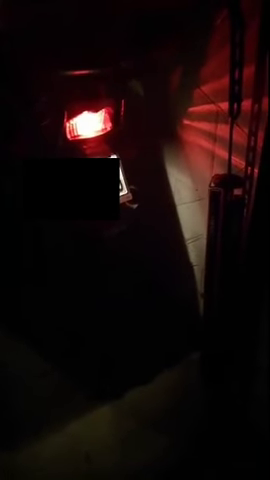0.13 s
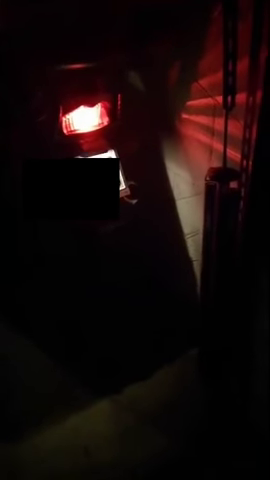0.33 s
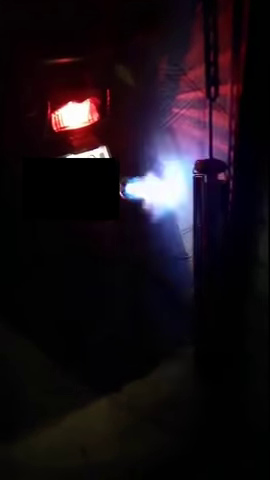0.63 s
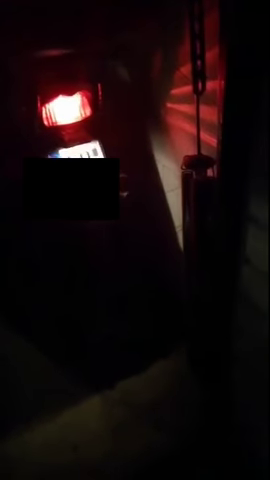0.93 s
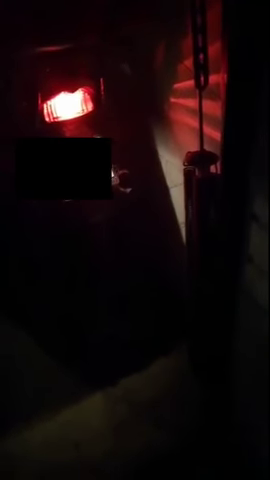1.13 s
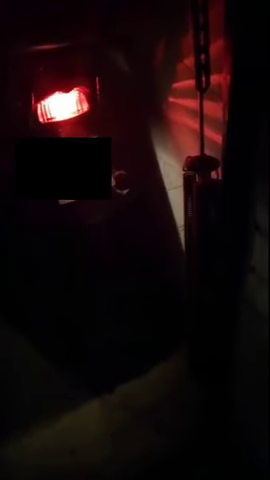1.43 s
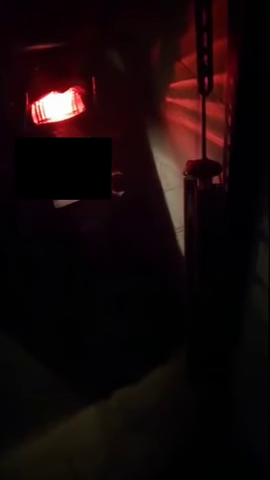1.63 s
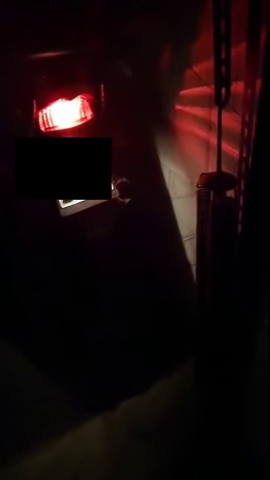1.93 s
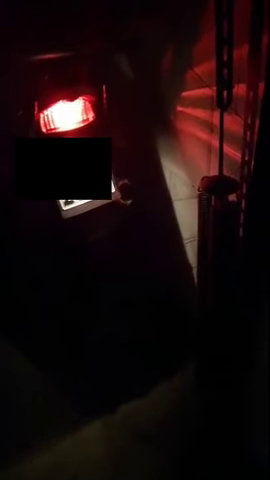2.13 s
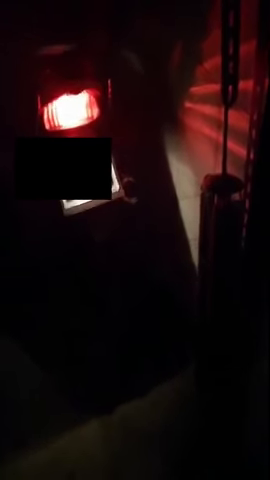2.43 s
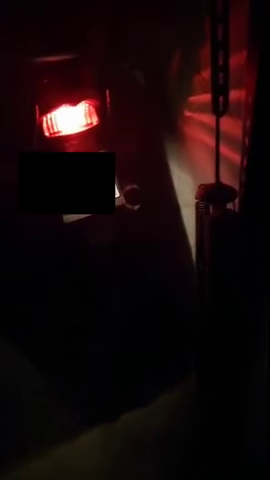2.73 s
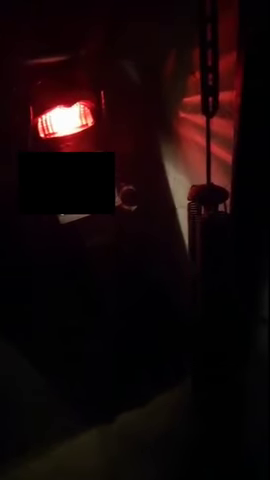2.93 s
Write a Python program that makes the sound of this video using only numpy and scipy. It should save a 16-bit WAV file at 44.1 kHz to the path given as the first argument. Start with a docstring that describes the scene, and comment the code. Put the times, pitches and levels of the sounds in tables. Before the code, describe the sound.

A four-cylinder motorcycle, heard close behind the exhaust, is blipped four times; each rasping howl leaps up, then winds down with burbles and sharp backfire pops in a small, hard-walled space, muffled on top and slightly overloaded.

```python
"""In a small hard-walled space, a four-cylinder motorcycle is blipped four times, heard from behind the exhaust.
Sines that follow the firing rate make the engine tone, whine and howl, with puffed noise for rasp and hiss.
Each firing under load also rings the tailpipe; unburnt fuel burbles and pops as the engine runs down.
Scattered echoes add the space. A small stereo recorder cuts the treble and clips the loudest peaks."""
import sys
import numpy as np
from scipy import signal
from scipy.fft import rfft, irfft
from scipy.io import wavfile
from scipy.ndimage import uniform_filter1d

SR = 44100
rng = np.random.default_rng(int(sys.argv[2]) if len(sys.argv) > 2 else 0)


def store_pcm(level_fs):
    """Save levels as 16-bit WAV."""
    pcm = np.round(np.clip(level_fs, -1, 1) * 32767).astype(np.int16)
    wavfile.write(sys.argv[1], SR, np.atleast_2d(pcm).T)


def amplitude_ratio(level_db):
    """Convert a level in decibels to the matching linear amplitude (field) ratio."""
    exponent = np.asarray(level_db, float) / 20
    return 10 ** exponent


N = 136710  # length in samples

# Firing rate and the tone at that rate: time_s, firing_hz, level_db
FIRING_CURVE = [(0, 198.4, -31.5), (.08, 189.3, -35), (.14, 223.3, -10.5), (.2, 273.5, -9.5),
                (.3, 359.6, -21.5), (.48, 321.4, -30), (.6, 269.3, -29.5), (.73, 246.7, -18),
                (.89, 217, -17.5), (.94, 213.7, -28), (1.01, 243.4, -11), (1.06, 280.5, -13),
                (1.12, 341.3, -13.5), (1.17, 353.4, -24.5), (1.26, 328.5, -29.5), (1.37, 295.6, -29.5),
                (1.42, 280, -20), (1.53, 256, -21), (1.57, 244.8, -15.5), (1.67, 225.5, -15.5),
                (1.7, 217.2, -25), (1.75, 210.8, -28.5), (1.81, 234, -8), (1.87, 293.3, -13.5),
                (1.92, 337.1, -10), (1.97, 365.5, -15), (2.1, 333.4, -22), (2.17, 308, -32),
                (2.3, 271, -24), (2.49, 228.2, -15.5), (2.545, 222.7, -24.5), (2.59, 235.1, -11.5),
                (2.64, 284.5, -15.5), (2.71, 356.3, -8.5), (2.78, 379.3, -15), (2.86, 355.8, -17.5),
                (2.93, 329.9, -22), (3.1, 272.7, -36)]
# Throttle blips: opens_s, shuts_s, howl_db
THROTTLE_BLIPS = [(0.088, 0.24, -22), (0.953, 1.106, -23), (1.756, 1.911, -22.5), (2.542, 2.695, -23.5)]
# Multiples of the firing rate in the howl and whine: multiple, level_db (before the pipe shapes it)
FIRING_ORDERS = [(.5, -7), (1.5, -10.5), (2, 5.5), (2.5, -10), (3, 4), (3.5, -9.5), (4, 1), (5, 1.5),
                 (6, -3), (7, -3.5)]
# How the pipe passes the howl: pitch_hz, gain_db
PIPE_RESPONSE = [(100, -6.5), (330, 7), (400, 8.5), (470, 8), (560, -4.5), (680, 0.5), (780, 0.5),
                 (920, -4), (1100, -6.5), (1450, 2), (1750, -14.5), (2030, -1.5), (3000, -6.5)]
# Colour of the exhaust rasp: pitch_hz, density_db (per Hz, only the shape counts)
RASP_COLOUR = [(150, -9), (300, 3), (480, -4), (800, -6.5), (1450, -1), (2050, 0), (2500, -11), (5500, -17)]
# Colour of the engine hiss: pitch_hz, density_db (per Hz, only the shape counts)
HISS_COLOUR = [(300, -6), (800, -3.5), (1500, 6.5), (2500, 3.5), (4200, 0), (5000, -0.5), (6000, -4)]
# What each loaded firing rings in the tailpipe: pitch_hz, level_db, t60_s
TAILPIPE_RINGS = [(825, 0.5, 0.029), (1305, -8.5, 0.042), (1595, 4.5, 0.016), (2017, -3.5, 0.026),
                  (4200, -12, 0.012)]
# Burble strength: time_s, level_db (BURBLE_DB is added)
BURBLE_CURVE = [(0, -33), (.35, -39.5), (.39, -53), (.5, -40.5), (.55, -30.5), (.9, -36.5), (1.2, -45.5),
                (1.3, -28.5), (1.75, -32.5), (1.99, -34.5), (2.05, -57.5), (2.14, -47), (2.19, -31),
                (2.55, -35.5), (2.79, -36), (2.9, -50.5), (2.94, -30), (3.1, -26.5)]
# Colour of the burble: pitch_hz, density_db (per Hz, only the shape counts)
BURBLE_COLOUR = [(20, -9.5), (50, -9), (90, 2), (160, -24.5), (250, -2.5), (430, -7), (560, -14),
                 (2500, -22.5)]
# Backfires: start_s, ring_peak_db, thump_db and crack_db (re the ring; THUMP_DB and CRACK_DB are added)
BACKFIRES = [(.585, -5.5, -27, -18.5), (.587, 5, 2, -23.5), (.592, -3.5, -2, -13), (0.6096, -5, 1, -28),
             (0.905, -10, -9.5, -27), (1.267, -1, -13.5, -17), (1.293, -12.5, -30, -9),
             (1.324, -2, -7, -4.5), (1.516, -7.5, -11, -12), (1.67, -10.5, -25, -23),
             (1.725, -8, -12.5, -19), (2.172, -6.5, 3, -23), (2.1809, 3.5, -4.5, -23.5),
             (2.1855, -5.5, -16, -29), (2.206, -9, -1.5, -31), (2.279, -6, -16.5, -12.5),
             (2.499, -5, -20.5, -34.5), (2.923, 0.5, -16, -10), (2.929, -6, -23.5, -2.5),
             (2.968, -4.5, -18, -10.5), (3.023, -3.5, -19.5, -13.5), (3.091, -2.5, -15, -19)]
# What each backfire rings in the pipe: pitch_hz, level_db (before scaling the sum to peak 1), t60_s
POP_RINGS = [(225, -1, .045), (340, 3, .008), (450, -9, .02), (750, -1, .006), (1500, -5, .012)]
# How alike the noise is at the two microphone ports: pitch_hz, likeness (1 = identical)
PORT_LIKENESS = [(60, 1), (200, 0.93), (400, 1), (800, 0.13), (1500, 0.39), (3000, 0.04), (5000, 0.034)]
# How far the left port lags the right: pitch_hz, lag_rad
PORT_LAG = [(50, .06), (250, 0.69), (460, 0.63), (800, 4.48), (1500, 5.9), (2200, 7.87), (5000, 16.44)]

# Levels here are set ahead of the room and the microphone; "per doubling" is per doubling of firing rate.
JITTER, TONE_WOBBLE_DB = .004, 2  # rms share of the firing rate; rms dB
COAST_DB, COAST_DB_PER_DOUBLING = -42, 27  # whine while coasting, at 300 firings a second
COAST_TILT_DB_PER_ORDER = 0.8
WOBBLE_DB_PER_ORDER, WOBBLE_S = .6, .014  # roughness under load
SPREAD = .55  # rms wander between the ports, radians
OPEN_S, OPEN_FROM_DB, SHUT_DB_PER_S = 0.083, -24.5, -180
HISS_DB, HISS_DB_PER_DOUBLING = -21, 23  # at 300 firings a second
RASP_DB, RASP_DB_PER_DOUBLING = 9.5, 15.5  # re the howl, at 300 firings a second
PUFF_DEPTH = 0.31  # how strongly each firing puffs the rasp and hiss
BARK_DB, BARK_DB_PER_DOUBLING = 5.5, 12.5  # re the howl, at 300 firings a second
BARK_UNEVEN_DB, BARK_SCATTER_S = 4.5, .00012  # rms, firing to firing
BURBLE_DB, BURBLE_S = 10, 0.023  # added level; fade time constant of one puff
BURBLES_PER_S, BURBLE_SIZE_DB = 220, 1.3  # average rate; scale of the chance in size
POP_RISE_S, SUCK_S, SUCK_DB = .0003, .0015, -9  # a brief dip in pressure leads each pop
THUMP_HZ, THUMP_T60_S, THUMP_DB = 67.5, 0.019, 0.5
CRACK_HZ, CRACK_WIDTH_HZ, CRACK_DB = 1840, 2560, 3
CRACK_RISE_S, CRACK_T60_S = .0006, .035
PATCH_DB = 2  # rms strength of the drifting patches in the noise
ROOM_T60_S, ROOM_BASS_CUT_HZ = 0.17, 210
ROOM_DB, POP_ROOM_DB = -9.5, -8  # sent to the room by the engine; by the pops
BASS_CUT_HZ, TREBLE_CUT_HZ = 58, 5525
SOFT_LIMIT = 1.55  # the microphone stage bends over towards this height
GAIN_DB, CLIP = -.3, .93


def evened(x):
    """Scales to rms 1."""
    return x / np.sqrt(np.mean(x ** 2) + 1e-20)


def read(points, hz):
    """Reads a spectrum table on a log-frequency axis."""
    f, value = np.transpose(points)
    return np.interp(np.log(hz + 1), np.log(f + 1), value)


def control(table, column):
    """One column of a table over time, per sample."""
    rows = np.array(table)
    return np.interp(np.arange(N) / SR, rows[:, 0], rows[:, column])


def drift(seconds):
    """Slow random wander of rms 1: noise smoothed twice."""
    size = max(int(seconds * SR), 2)
    once = uniform_filter1d(rng.standard_normal(N), size)
    return evened(uniform_filter1d(once, size))


def decaying_sine(t, hz, db, t60):
    """A ringing mode that falls by 60 dB in t60 seconds."""
    return amplitude_ratio(db - 60 * t / t60) * np.sin(2 * np.pi * hz * t)


def both_ports(x):
    """One sound as the two ports hear it, the left later."""
    lag = np.exp(-1j * read(PORT_LAG, np.fft.rfftfreq(len(x), 1 / SR)))
    return np.array([irfft(rfft(x) * lag, len(x)), x])


def noise(colour):
    """Stereo noise of a given colour with drifting patches, alike in the bass."""
    frames, hz = N // 128 + 5, np.fft.rfftfreq(512, 1 / SR)
    a, b, c, d, patches = rng.standard_normal((frames, 257, 5)).T
    patches = uniform_filter1d(patches, size=4, axis=0)  # smooth over pitch
    patches = evened(uniform_filter1d(patches, size=16, axis=1))  # and over time
    same = np.clip(read(PORT_LIKENESS, hz), -1, 1)[:, None]
    right = a + 1j * b
    left = same * right + np.sqrt(1 - same ** 2) * (c + 1j * d)
    left = left * np.exp(-1j * read(PORT_LAG, hz))[:, None]
    spectra = np.array([left, right]) * amplitude_ratio(read(colour, hz)[:, None] + PATCH_DB * patches)
    return evened(signal.istft(spectra, nperseg=512, noverlap=384)[1][:, :N])


def partial(turns, hz, spread):
    """A sine of rms 1 that reaches the left port later, its phases wandering apart."""
    apart = read(PORT_LAG, hz) + spread * drift(0.058)
    phase = 2 * np.pi * (turns + rng.random())
    return np.sqrt(2) * np.cos(phase - np.array([[.5], [-.5]]) * apart)


def firing_tone(turns, hz):
    """The sine at the firing rate itself, with an unsteady level."""
    level_db = control(FIRING_CURVE, 2) + TONE_WOBBLE_DB * drift(0.0047)
    return amplitude_ratio(level_db) * partial(turns, hz, SPREAD / 3)


def hiss(doublings):
    """Airy noise that grows with the firing rate."""
    return amplitude_ratio(HISS_DB + HISS_DB_PER_DOUBLING * doublings) * noise(HISS_COLOUR)


def whine_and_howl(turns, hz, doublings, load):
    """Multiples of the firing rate shaped by the pipe: a clean coasting whine and a rough loaded howl."""
    coast = amplitude_ratio(COAST_DB + COAST_DB_PER_DOUBLING * doublings + TONE_WOBBLE_DB * drift(0.026))
    out = np.zeros((2, N))
    for order, db in FIRING_ORDERS:
        rough = amplitude_ratio(WOBBLE_DB_PER_ORDER * min(order, 5) * drift(WOBBLE_S))
        drive = load * rough + coast * amplitude_ratio(COAST_TILT_DB_PER_ORDER * order)
        passed = amplitude_ratio(db + read(PIPE_RESPONSE, order * hz))
        out += passed * drive * partial(order * turns, order * hz, SPREAD)
    return out


def burble():
    """Many small misfires, each a short low puff."""
    struck = rng.random(N) < BURBLES_PER_S / SR
    size = struck * amplitude_ratio(BURBLE_SIZE_DB * np.minimum(rng.exponential(1, N), 4))
    fade = np.exp(-np.arange(4000) / SR / BURBLE_S)
    lumps = signal.oaconvolve(size, fade)[:N]
    return amplitude_ratio(control(BURBLE_CURVE, 1) + BURBLE_DB) * evened(lumps * noise(BURBLE_COLOUR))


def throttle():
    """Gain of the load: swells as the throttle opens, falls away once it shuts."""
    t, load = np.arange(N) / SR, np.zeros(N)
    for opens, shuts, db in THROTTLE_BLIPS:
        swell_db = OPEN_FROM_DB * np.clip(1 - (t - opens) / OPEN_S, 0, 4) ** 2
        fall_db = SHUT_DB_PER_S * np.maximum(t - shuts, 0)
        load += amplitude_ratio(db + swell_db + fall_db)
    return load


def rasp(doublings, load):
    """Harsh exhaust noise under load, stronger at a faster firing rate."""
    return load * amplitude_ratio(RASP_DB + RASP_DB_PER_DOUBLING * doublings) * noise(RASP_COLOUR)


def bark(turns, doublings, load):
    """Every firing kicks the short resonances of the tailpipe, uneven in size and timing."""
    firings = np.flatnonzero(np.diff(np.floor(turns)))
    t, rings = np.arange(1000) / SR, np.zeros(N)
    for hz, db, t60 in TAILPIPE_RINGS:
        size, late = rng.standard_normal((2, len(firings)))
        at = np.clip(firings + late * BARK_SCATTER_S * SR, 0, N - 1).astype(int)
        kicks = np.zeros(N)
        kicks[at] = amplitude_ratio(BARK_UNEVEN_DB * size)
        rings += signal.oaconvolve(kicks, decaying_sine(t, hz, db, t60))[:N]
    return load * amplitude_ratio(BARK_DB + BARK_DB_PER_DOUBLING * doublings) * evened(both_ports(rings))


def engine():
    """All the sounds tied to the firing rate, with rasp and hiss puffed at each firing."""
    steady_hz = control(FIRING_CURVE, 1)
    hz = steady_hz * (1 + JITTER * drift(0.0082))
    turns = np.cumsum(hz) / SR  # one turn per firing
    doublings, load = np.log2(steady_hz / 300), throttle()
    puffs = 1 + PUFF_DEPTH * np.cos(2 * np.pi * turns)
    tones = firing_tone(turns, hz) + whine_and_howl(turns, hz, doublings, load)
    return tones + bark(turns, doublings, load) + puffs * (rasp(doublings, load) + hiss(doublings))


def pops():
    """Each backfire rings the pipe, pushes a thump and spits a crack of noise."""
    out, t = np.zeros(N + 8000), np.arange(8000) / SR
    ring = sum(decaying_sine(t, hz, db, t60) for hz, db, t60 in POP_RINGS)
    ring = ring / abs(ring).max()
    suck = amplitude_ratio(SUCK_DB) * np.sin(np.pi * np.arange(0, 1, 1 / SR / SUCK_S) ** 2)
    thump = decaying_sine(t, THUMP_HZ, THUMP_DB, THUMP_T60_S)
    edges = [CRACK_HZ - CRACK_WIDTH_HZ / 2, CRACK_HZ + CRACK_WIDTH_HZ / 2]
    band = signal.butter(2, edges, "band", fs=SR, output="sos")
    swell = np.minimum(t / POP_RISE_S, 1)
    crack_shape = amplitude_ratio(CRACK_DB - 60 * t / CRACK_T60_S) * np.minimum(t / CRACK_RISE_S, 1)
    for start, db, thump_db, crack_db in BACKFIRES:
        spit = evened(signal.sosfilt(band, rng.standard_normal(8000)))
        bang = ring + amplitude_ratio(thump_db) * thump + amplitude_ratio(crack_db) * crack_shape * spit
        at = round(start * SR)
        out[at:at + 8000] += amplitude_ratio(db) * swell * bang
        out[at - len(suck):at] -= amplitude_ratio(db) * suck
    return both_ports(out)[:, :N]


def room(x):
    """Sparse reflections of random sign, different at each port."""
    size = SR // 2
    taps = np.zeros((2, size))
    at = np.arange(300, size - 20, 20) + rng.integers(0, 20, (2, (size - 301) // 20))
    np.put_along_axis(taps, at, rng.choice([-1., 1.], at.shape), 1)
    taps *= amplitude_ratio(-60 * np.arange(size) / SR / ROOM_T60_S)
    taps = signal.sosfilt(signal.butter(2, ROOM_BASS_CUT_HZ, "high", fs=SR, output="sos"), taps)
    return signal.fftconvolve(x, taps / np.linalg.norm(taps[0]), axes=1)[:, :N]


def scene():
    """Engine, burble and pops with their reflections."""
    motor, bangs = engine() + burble(), pops()
    return motor + bangs + room(amplitude_ratio(ROOM_DB) * motor + amplitude_ratio(POP_ROOM_DB) * bangs)


def low_pass(x):
    """Removes everything above the highest recorded frequency."""
    return signal.sosfilt(signal.butter(12, 15870, fs=SR, output="sos"), x)


def record(dry):
    """Bass roll-off, soft overload, steep treble cut, then hard clipping."""
    thin = signal.sosfilt(signal.butter(2, BASS_CUT_HZ, "high", fs=SR, output="sos"), dry)
    bent = SOFT_LIMIT * np.tanh(thin / SOFT_LIMIT)
    treble_cut = signal.firwin(401, TREBLE_CUT_HZ, window=("kaiser", 10), fs=SR)
    dull = signal.oaconvolve(bent, treble_cut[None], "same")
    mix = np.clip(amplitude_ratio(GAIN_DB) * dull, -CLIP, CLIP)
    return low_pass(mix)


dry = scene()
out = record(dry)
store_pcm(out)
```